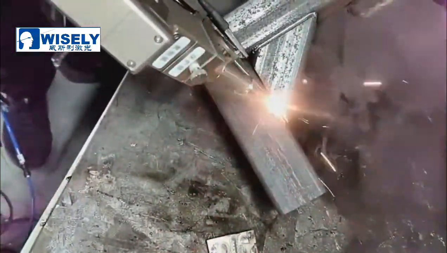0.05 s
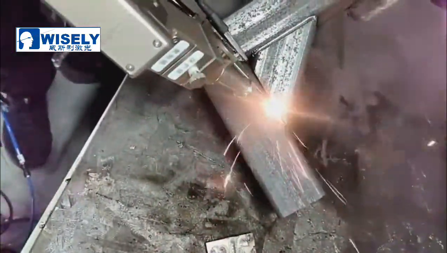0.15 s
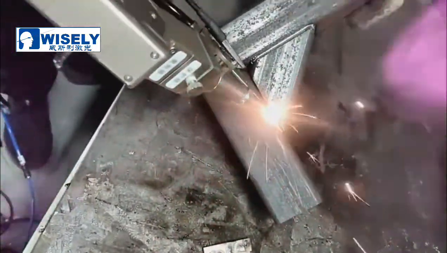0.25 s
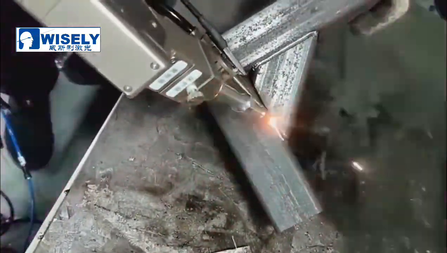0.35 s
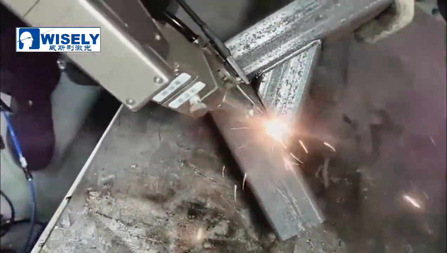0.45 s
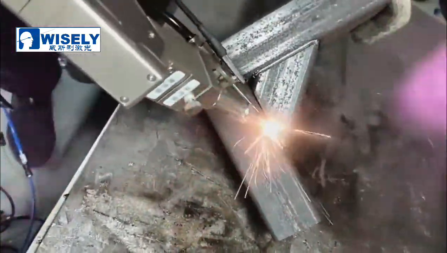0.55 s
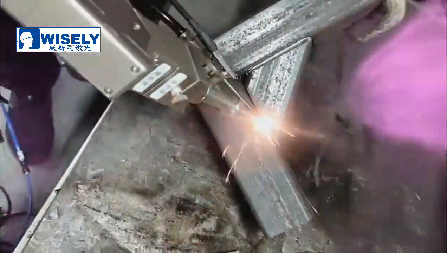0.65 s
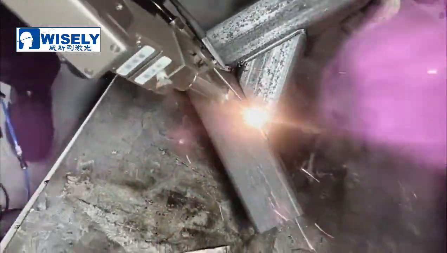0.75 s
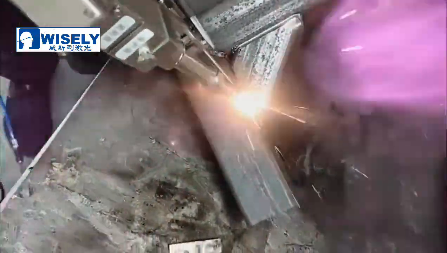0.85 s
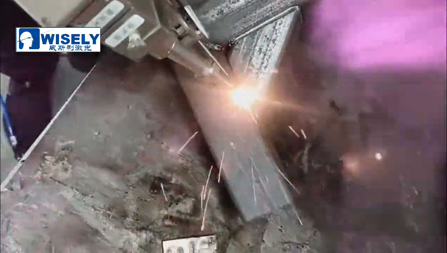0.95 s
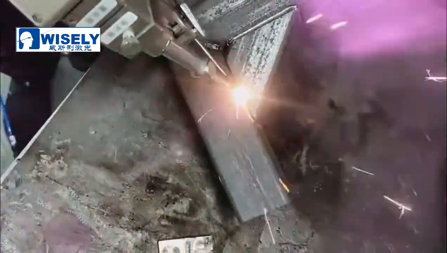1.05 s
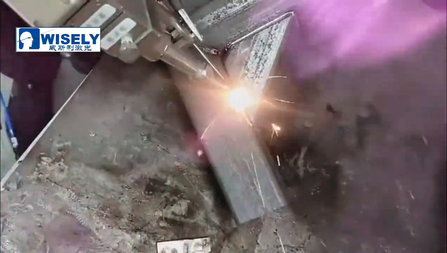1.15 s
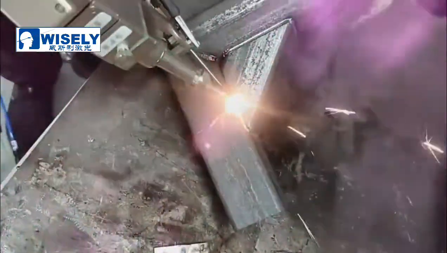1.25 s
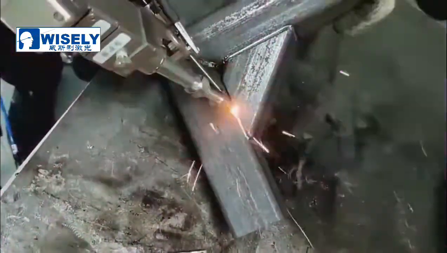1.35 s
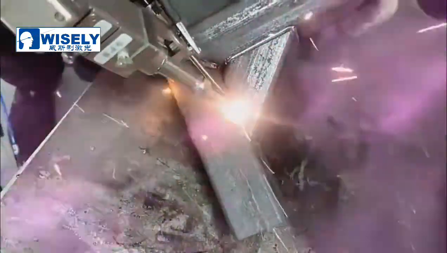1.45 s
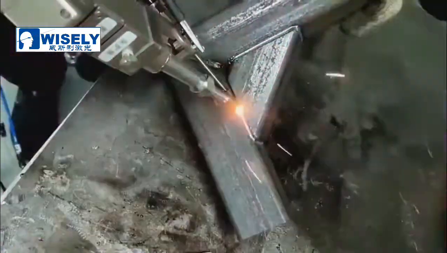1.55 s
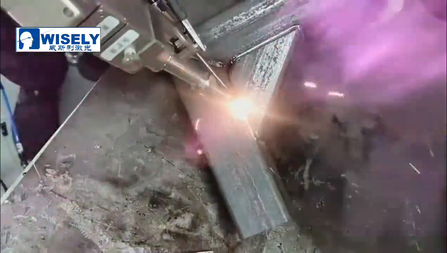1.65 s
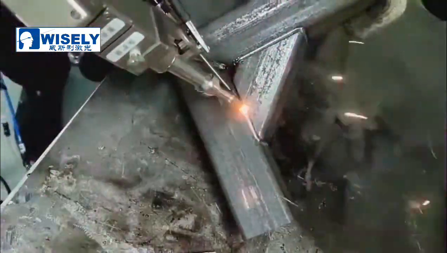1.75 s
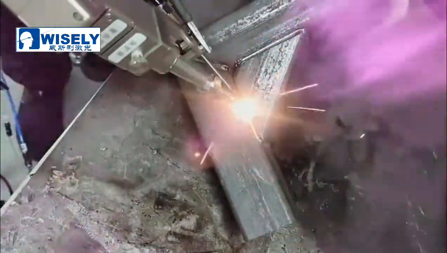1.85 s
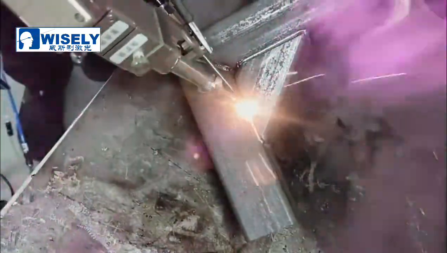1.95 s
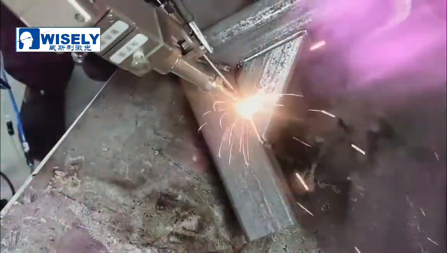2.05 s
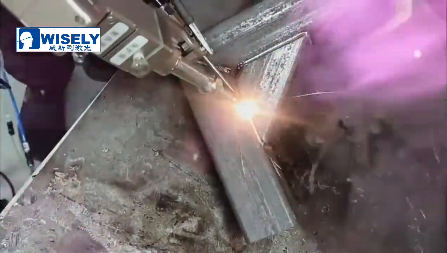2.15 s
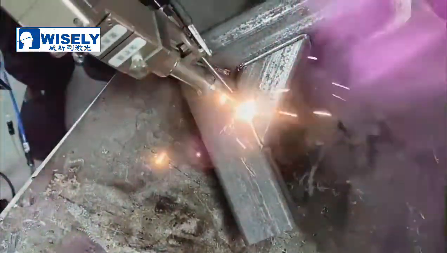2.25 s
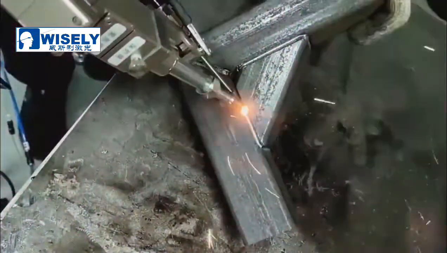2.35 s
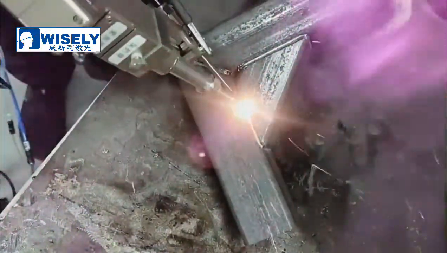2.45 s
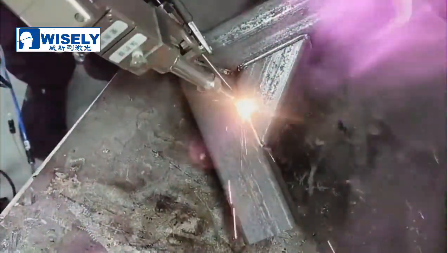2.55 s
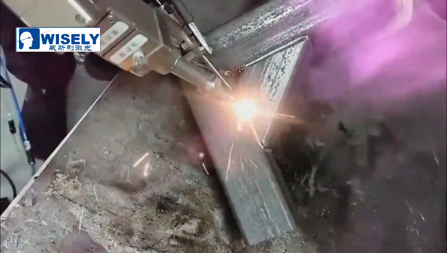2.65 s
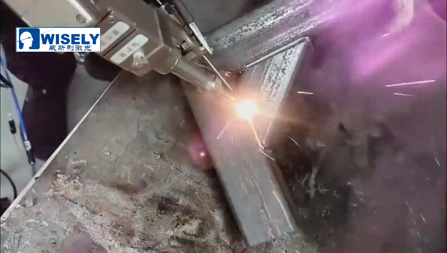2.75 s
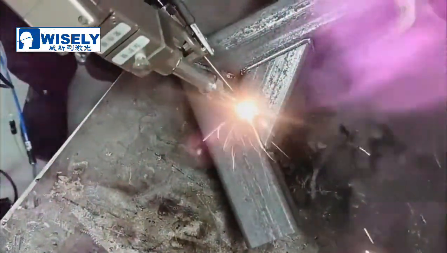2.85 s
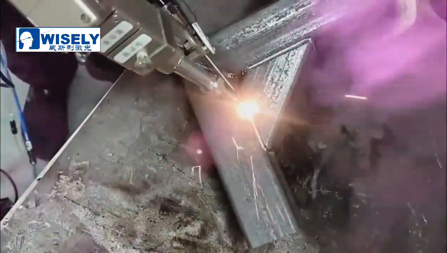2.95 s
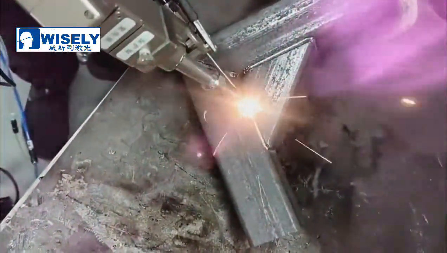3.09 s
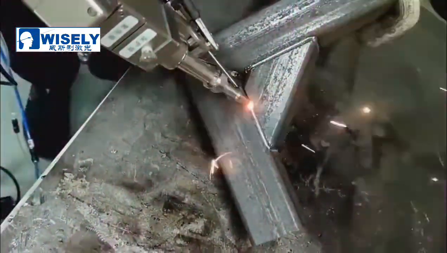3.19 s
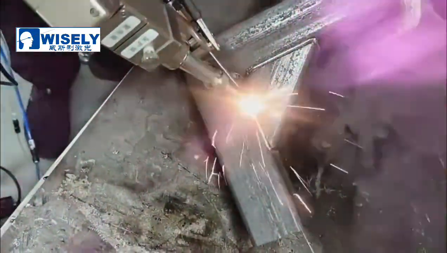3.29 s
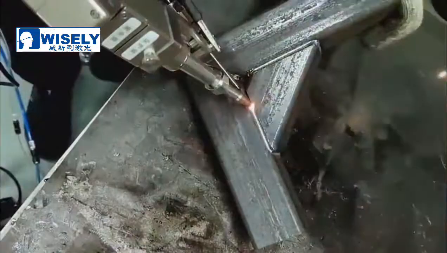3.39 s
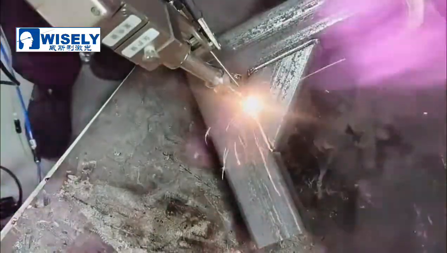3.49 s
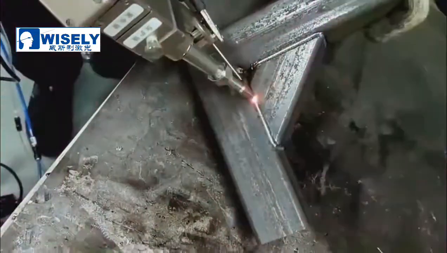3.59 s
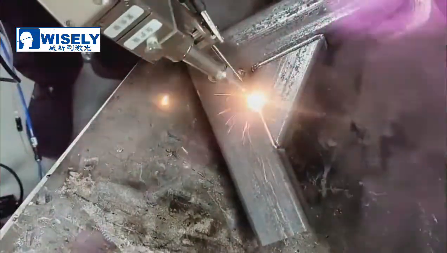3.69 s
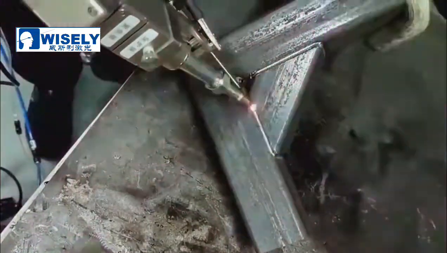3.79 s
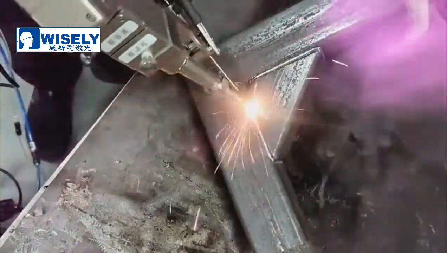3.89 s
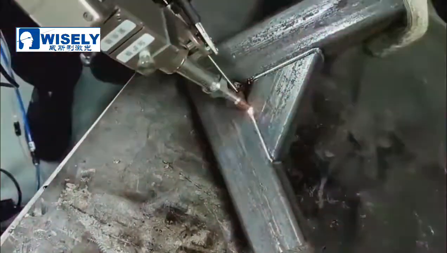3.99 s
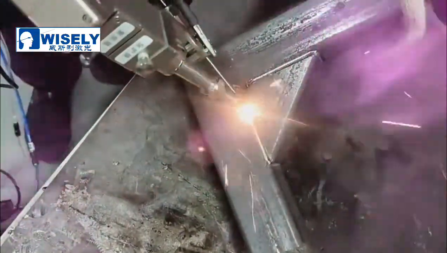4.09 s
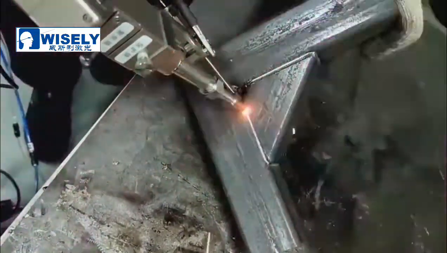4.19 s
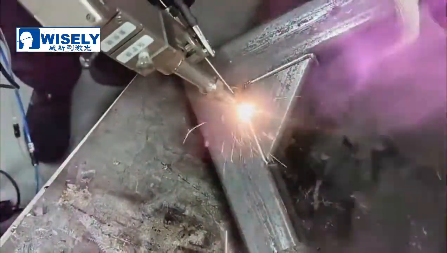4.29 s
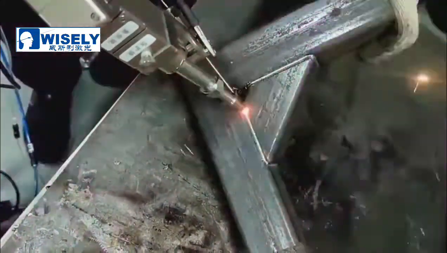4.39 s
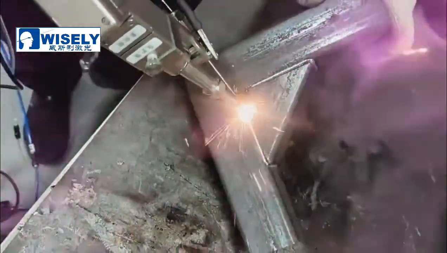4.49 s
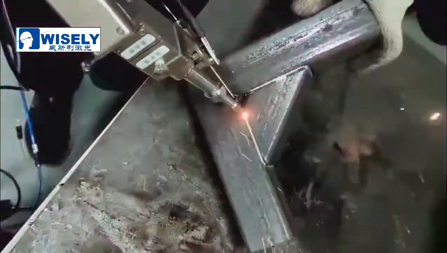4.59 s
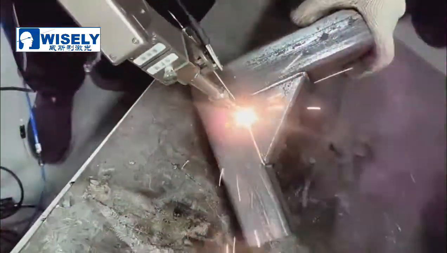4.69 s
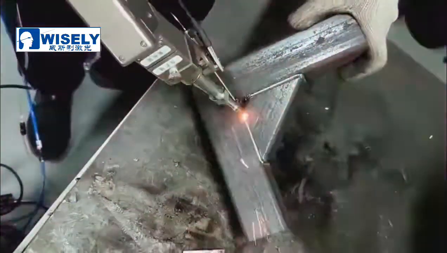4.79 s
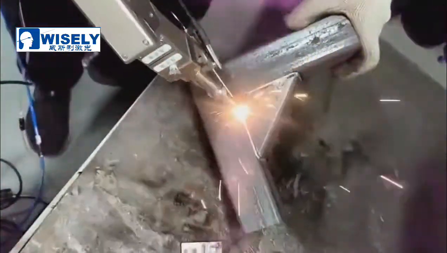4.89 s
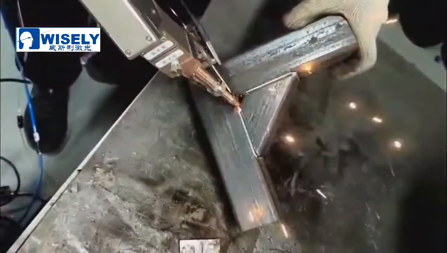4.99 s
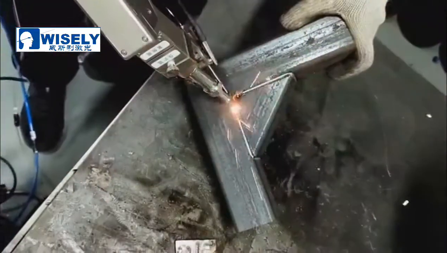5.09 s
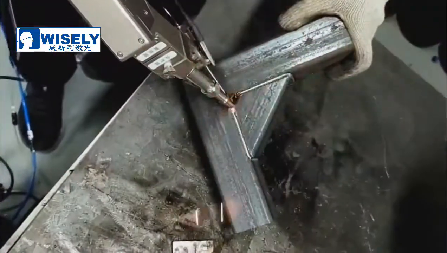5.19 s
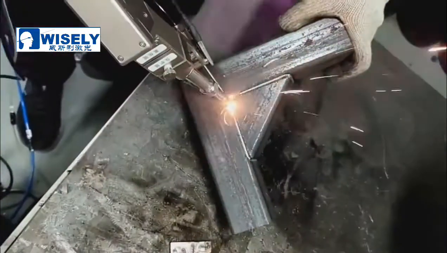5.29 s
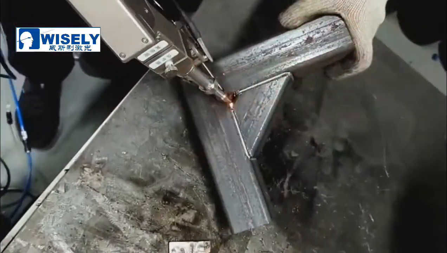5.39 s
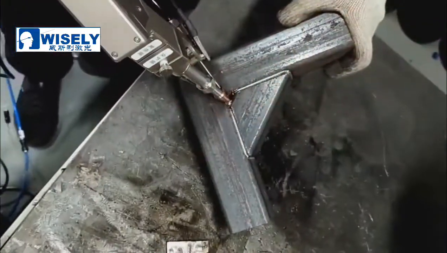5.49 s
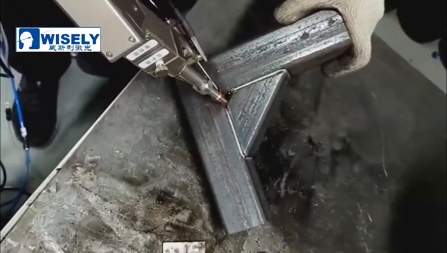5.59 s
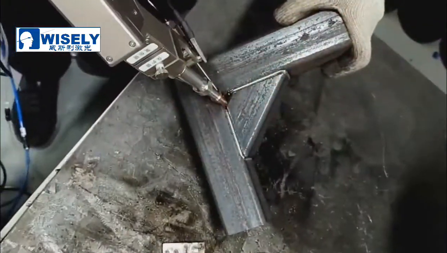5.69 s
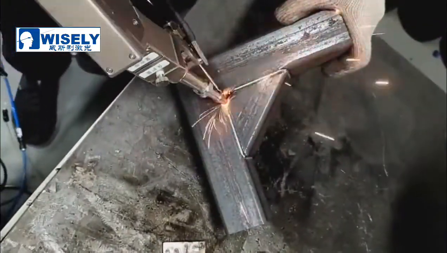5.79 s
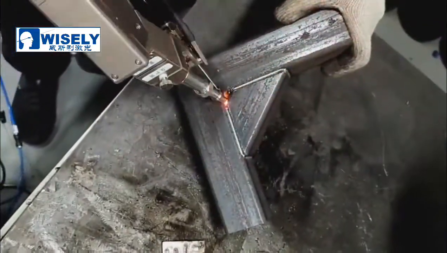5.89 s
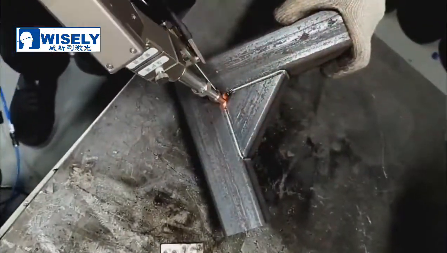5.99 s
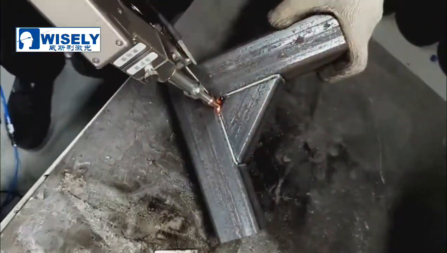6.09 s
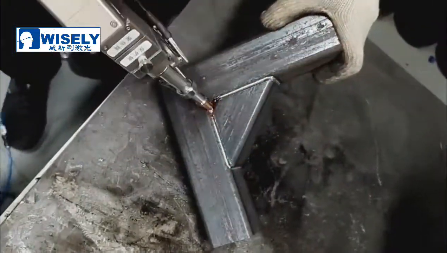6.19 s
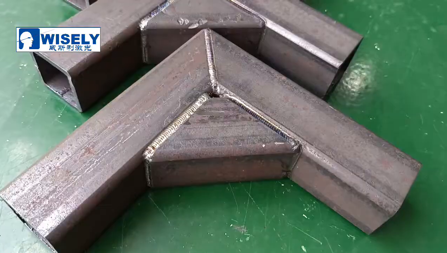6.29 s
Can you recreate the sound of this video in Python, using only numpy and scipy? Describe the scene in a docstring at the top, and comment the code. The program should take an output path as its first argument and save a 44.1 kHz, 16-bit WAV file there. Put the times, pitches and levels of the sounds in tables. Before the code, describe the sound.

Close, pulsing hiss and spatter of laser welding over low machine hum, ending with a motor swell, two tiny metal knocks and a sagging gas blow.

```python
"""Nozzle gas hisses over a droning fume fan and chiller; at once spatter pops and a laser welder starts firing.
Heard close at a workshop bench, on one microphone: five times a second the beam boils steel tube into
a hissing, crackling plume, made of noise and random bursts that ring in the gap between torch and tube.
Late on a motor swells and dies away, the welding stops and the gas shuts off to a faint bleed.
A puff and one last sagging blow of gas follow, and the nozzle knocks twice on the tube."""
import sys
import numpy as np
from scipy import signal
from scipy.fft import rfft, irfft
from scipy.io import wavfile
from scipy.ndimage import map_coordinates

SR = 44100
rng = np.random.default_rng(int(sys.argv[2]) if len(sys.argv) > 2 else 0)


def transcribe(signal):
    """Save signal, clipped to [-1, 1], as a 16-bit WAV file at the path in sys.argv[1]."""
    frames = np.atleast_2d(signal).T
    limited = np.clip(frames, -1, 1)
    pcm = np.round(limited * 32767).astype(np.int16)
    wavfile.write(sys.argv[1], SR, pcm)


N = 279594
TIME = np.arange(N) / SR
CUTOFF_HZ = 14050   # nothing is heard far above this


def from_db(db):
    """Decibels to amplitude gain."""
    return 10 ** (np.asarray(db) / 20)


def rms_one(x):
    """Scale to unit power."""
    return x / np.sqrt(np.mean(x ** 2) + 1e-20)


def in_time(rows):
    """Interpolate each column after the time column to a curve at every sample."""
    times, *columns = np.transpose(rows)
    return [np.interp(TIME, times, column) for column in columns]


def step(moment_s, swing_s):
    """A smooth tanh rise from 0 to 1, halfway up at the moment."""
    return (1 + np.tanh((TIME - moment_s) / swing_s)) / 2


def drift(rate_hz):
    """Random wander of spread about 1: noise through a double low-pass pole at this rate."""
    hop = 40   # computed on every 40th sample, then interpolated
    settling = 2000
    pole = np.exp(-2 * np.pi * rate_hz * hop / SR)
    noise = rng.standard_normal(N // hop + settling + 2)
    slow = signal.lfilter([1], [1, -2 * pole, pole * pole], noise)[settling:]
    return np.interp(np.arange(N) / hop, np.arange(len(slow)), rms_one(slow))


def response(spectrum, resonances=(), size=8192):
    """Minimum-phase impulse response of unit energy with this spectrum and these peaks or dips."""
    hz = np.maximum(np.arange(size // 2 + 1) * SR / size, 1)
    points = np.array(spectrum)
    level_db = np.interp(np.log(hz), np.log(points[:, 0]), points[:, 1])
    for centre_hz, width_hz, peak_db in resonances:
        level_db = level_db + peak_db * .5 ** ((2 * (hz - centre_hz) / width_hz) ** 2)
    level_db = level_db - np.clip((hz - CUTOFF_HZ) / 20, 0, 40)
    # folding the cepstrum onto positive times makes the response causal
    cepstrum = irfft(np.log(from_db(level_db)))
    cepstrum[1:size // 2] *= 2
    cepstrum[size // 2 + 1:] = 0
    impulse = irfft(np.exp(rfft(cepstrum)))
    return impulse / np.sqrt(np.sum(impulse ** 2))


def colour(x, spectrum, resonances=()):
    """Pass a sound through a spectrum and its resonances."""
    return signal.fftconvolve(x, response(spectrum, resonances))[:N]


def crackle(per_s, spread_db):
    """Tiny clicks at random moments, most small and a few large; rms 1."""
    size_db = spread_db * np.minimum(rng.exponential(1, N), 4)
    clicks = from_db(size_db) * rng.choice([-1, 1], N)
    return rms_one(clicks * (rng.random(N) < per_s / SR))


def bursts(rows, decay_s, crack_db):
    """Each row (time [s], level [dB]) is one sharp crack and a dying puff of noise."""
    out = np.zeros(N)
    age = TIME[:SR // 10]
    decay = np.exp(-age / decay_s)
    decay_rms = np.sqrt(np.mean(decay ** 2))
    puffs = rng.standard_normal((len(rows), len(age)))
    for (time_s, level_db), puff in zip(rows, puffs):
        shape = puff * decay
        shape[0] = from_db(crack_db)   # the crack is a single sample
        start = round(time_s * SR)
        out[start:start + len(age)] += from_db(level_db) * rms_one(shape) * decay_rms
    return out


def moving_band(x, centre_hz, width_hz, order=256):
    """A resonance of gain 1 whose centre follows a curve, updated every `order` samples."""
    out, state = np.zeros(N), np.zeros(2)
    radius = np.exp(-np.pi * width_hz / SR)
    zeros = np.array([1, 0, -1]) * (1 - radius * radius) / 2
    for i in range(0, N, order):
        poles = [1, -2 * radius * np.cos(2 * np.pi * centre_hz[i] / SR), radius * radius]
        out[i:i + order], state = signal.lfilter(zeros, poles, x[i:i + order], zi=state)
    return out


def tone(hz, waver_hz):
    """A machine tone that wavers in pitch and strength; rms 1."""
    phase = 2 * np.pi * np.cumsum(hz + waver_hz * drift(8.22)) / SR
    return rms_one(np.sin(phase) * from_db(1.6 * drift(3.9)))


VALVE_S = 0.013   # swing of the gas valve
BLEED_DB, BLEED_FALL_DB_PER_S = -20, 35   # relative to full flow


def flow_until(off_s):
    """Full gas flow until the valve shuts, then the hose bleeds a faint, dying hiss."""
    shut = step(off_s, VALVE_S)
    bleed_db = BLEED_DB - BLEED_FALL_DB_PER_S * np.maximum(TIME - off_s, 0)
    return 1 - shut + shut * from_db(bleed_db)


# spectrum of the gas from the nozzle: (frequency [Hz], relative level per Hz [dB])
GAS_SPECTRUM = [(600, -21.5), (1500, -18), (2100, -5.5), (3200, -4), (4100, 2), (5200, 0), (6400, -1.5),
                (7300, -2), (8100, -14), (9000, -22), (11500, -26), (12900, -12), (14000, -11)]
# resonances of the gas jet in the joint: (centre [Hz], width [Hz], peak [dB])
JET_RESONANCES = [(2370, 165, -11), (2620, 200, -3.5), (3420, 200, 1), (4110, 210, 5.5), (5040, 270, -1.5),
                  (5700, 410, 4), (6400, 450, 5), (7270, 350, -12), (8020, 440, 9)]
GAS_DB, GAS_OFF_S = -41.5, 5.437   # level at the nozzle, before the gap colours it


def shielding_gas(flutter_db):
    """Turbulent gas streams from the nozzle, fluttering, during and between the shots."""
    flow = flow_until(GAS_OFF_S) * from_db(GAS_DB + flutter_db * drift(110))
    return colour(rng.standard_normal(N) * flow, GAS_SPECTRUM, JET_RESONANCES)


# level of the low rumble: (time [s], level [dB])
RUMBLE_LEVEL_CURVE = [(0, -44.3), (2.9, -43.5), (3.05, -42.5), (3.84, -40), (3.9, -53), (4.1, -40.5),
                      (4.45, -44), (5.28, -39), (5.55, -42.5), (6.25, -45.5)]
# spectrum of the low rumble: (frequency [Hz], relative level per Hz [dB])
RUMBLE_SPECTRUM = [(22, -31), (48, -27.5), (68, -6), (88, -1), (105, -1.5), (125, -1.5), (150, -7.5),
                   (185, -5.5), (240, -13), (320, -20), (600, -59.5)]
# spectrum of rushing air, for the fan and the motor: (frequency [Hz], relative level per Hz [dB])
AIR_SPECTRUM = [(150, -7.5), (300, 0), (420, 1), (520, -2.5), (680, 0), (900, -5.5), (1400, -12.5),
                (2500, -15.5), (3500, -22), (5600, -22), (8000, -32.5), (14000, -48.5)]
# chiller tones: (frequency [Hz], rms level [dB])
HUM_TONES = [(127, -50), (478, -67.5), (653, -62)]


def machines(buffet_db):
    """Behind the bench: the fume fan is lumpy rumble and steady rush of noise, the chiller wavering tones."""
    rumble_db, = in_time(RUMBLE_LEVEL_CURVE)
    lumps = from_db(rumble_db + buffet_db * drift(30))
    rumble = lumps * colour(rng.standard_normal(N), RUMBLE_SPECTRUM)
    rush = from_db(-51.5) * colour(rng.standard_normal(N), AIR_SPECTRUM)
    hum = sum(from_db(level_db) * tone(hz, waver_hz=3.08) for hz, level_db in HUM_TONES)
    return rumble + rush + hum


# spatter bursting from the melt: (time [s], relative level [dB])
SPATTER_POPS = [(0.0379, -16.5), (0.2382, -19), (0.4441, -24), (0.6432, -26), (1.0746, -18), (1.4395, -21),
                (1.4661, -19.5), (1.5564, -19), (1.759, -17), (1.7755, -19), (2.2427, -16.5),
                (2.464, -18.5), (2.8443, -27), (3.4462, -18.5), (3.8685, -24), (4.2719, -16.5),
                (4.4411, -17.5), (4.475, -22), (4.6393, -26), (4.6752, -20.5)]
# spectrum of a pop: (frequency [Hz], relative level per Hz [dB])
POP_SPECTRUM = [(300, -0.5), (1400, -14), (3000, -5.5), (4300, 3.5), (8000, -3.5), (14000, -5)]
# resonances and dips of the gap between nozzle and joint, which also colour the plume:
# (centre [Hz], width [Hz], peak [dB])
GAP_RESONANCES = [(1830, 48, 7), (2160, 110, 6), (2390, 200, -3), (2630, 300, -1.5), (4070, 250, 4),
                  (4630, 270, 5), (4990, 110, 2), (7180, 300, -3.5), (7770, 760, 4), (9580, 350, -7.5),
                  (10140, 330, 2.5), (11840, 450, -3), (12350, 370, 4), (13300, 320, -0.5),
                  (13600, 400, 2.5)]


def spatter(trim_db):
    """Drops burst from the melt: each is a crack and a very short puff, ringing in the gap."""
    pops = bursts(SPATTER_POPS, decay_s=.0018, crack_db=13)
    return from_db(trim_db) * colour(pops, POP_SPECTRUM, GAP_RESONANCES)


# the laser fires on a clock until the trigger is let go
SHOTS_PER_S, FIRST_SHOT_S, TRIGGER_OFF_S = 5, .041, 5.314
SHOT_S, SHOT_RISE_S, SHOT_FALL_S = 0.15, 0.014, 0.0085   # length, and swings of rise and fall


def beam_power(spread_db):
    """On each clock tick a shot of slightly random strength swells as the steel boils, then ramps down."""
    starts = np.arange(FIRST_SHOT_S, TRIGGER_OFF_S, 1 / SHOTS_PER_S)
    strengths_db = spread_db * rng.standard_normal(len(starts))
    power = np.zeros(N)
    for on, strength_db in zip(starts, strengths_db):
        off = min(on + SHOT_S, TRIGGER_OFF_S)   # letting go cuts the last shot short
        power += from_db(strength_db) * step(on, SHOT_RISE_S) * (1 - step(off, SHOT_FALL_S))
    return power


# strength of the plume, weaker as the torch reaches the corner: (time [s], relative level [dB])
PLUME_LEVEL_CURVE = [(0, -33), (3.5, -32), (4.45, -34), (5.1, -36.5), (5.3, -36)]
# spectrum of the plume: (frequency [Hz], relative level per Hz [dB])
PLUME_SPECTRUM = [(500, -26.5), (1500, -22.5), (2100, -12.5), (3200, -4.5), (4000, -1), (5500, -2.5),
                  (7000, -3), (8500, -3), (11000, -1), (12500, 1), (14000, 1.5)]


def plume(power, trim_db, crackle_db, flutter_db, surge_db, simmer_db):
    """Metal vapour jets from the melt, fluttering and crackling; the hot pool simmers on after each shot."""
    boil = rms_one(rng.standard_normal(N) + from_db(crackle_db) * crackle(per_s=5000, spread_db=3))
    unrest = from_db(flutter_db * drift(160) + surge_db * drift(9.8))
    cooling = np.exp(-1 / (.04 * SR))   # the pool cools with a 40 ms time constant
    simmer = from_db(simmer_db) * signal.lfilter([1 - cooling], [1, -cooling], power)
    vapour = boil * unrest * np.maximum(power, simmer)
    strength_db, = in_time(PLUME_LEVEL_CURVE)
    return from_db(trim_db + strength_db) * colour(vapour, PLUME_SPECTRUM, GAP_RESONANCES)


def restless(x, count=5):
    """The melt changes shape, so broad bands of its hiss swell and sink on their own."""
    for hz in np.geomspace(4300, 12800, count):
        swell = from_db(1.5 * drift(4)) - 1
        x = x + swell * signal.lfilter(*signal.iirpeak(hz, 6, fs=SR), x)
    return x


# two weakened bands and the ring of the gap, as the hand moves:
# (time [s], first weak band [Hz], second weak band [Hz], ring [Hz], ring gain [factor])
HAND_POSE = [(0, 2680, 3170, 3030, .8), (.3, 2640, 3170, 3110, 2.2), (.8, 2690, 3320, 3100, 2.4),
             (1.2, 3100, 3180, 2780, .3), (4.3, 3060, 3310, 2740, .3), (4.55, 3430, 3640, 2680, .7),
             (4.9, 3280, 3550, 2730, 1.8), (5.4, 3280, 3540, 2830, 3.3)]


def gap_ring(x, weak_width_hz, ring_width_hz, count=2):
    """Sound bouncing between torch and tube builds up in one band; two narrow bands are weakened and wander."""
    first_hz, second_hz, ring_hz, ring_gain = in_time(HAND_POSE)
    x = x + ring_gain * moving_band(x, ring_hz, ring_width_hz)
    tremor = drift(4.6)   # shared by both bands
    for weak_hz in (first_hz, second_hz):
        wander_hz = 45 * tremor + 50 * drift(8)
        for repeat in range(count):
            x = x - moving_band(x, weak_hz + wander_hz, weak_width_hz)
    return x


def torch_shadow(x):
    """Turning into the corner, the torch hides the weld and shades its treble."""
    dull = signal.lfilter(*signal.butter(1, 7500, fs=SR), x)
    treble = x - dull
    return dull + treble * from_db(-8.5 * step(5.32, swing_s=0.37))


def weld():
    """Plume, spatter and gas, mixed with the gap's ring."""
    power = beam_power(spread_db=.5)
    pops = spatter(trim_db=-3.9)
    vapour = plume(power, trim_db=2.0, crackle_db=-3, flutter_db=1.51, surge_db=0.75, simmer_db=-14.5)
    gas = shielding_gas(flutter_db=2.5)
    share = np.minimum(2 * power, 1)   # share of the gas that is filtered with the plume
    filtered = gap_ring(restless(vapour) + pops + share * gas, weak_width_hz=332, ring_width_hz=140)
    return torch_shadow(filtered + (1 - share) * gas)


MOTOR_PEAK_S, MOTOR_RISE_DB_PER_S, MOTOR_FALL_DB_PER_S = 5.27, 15.5, 41
WHINE_HZ, WHINE_DB, MOTOR_AIR_DB = 693, -53.5, -48   # levels at the peak


def motor():
    """A motor's whine and rush of air swell slowly together and die faster."""
    age = TIME - MOTOR_PEAK_S
    effort = from_db(np.minimum(MOTOR_RISE_DB_PER_S * age, -MOTOR_FALL_DB_PER_S * age))
    air = from_db(MOTOR_AIR_DB) * colour(rng.standard_normal(N), AIR_SPECTRUM)
    whine = from_db(WHINE_DB) * tone(WHINE_HZ, waver_hz=5.98)
    return effort * (air + whine)


BLOW_ON_S, BLOW_OFF_S, BLOW_DB, BLOW_SAG_DB_PER_S = 5.682, 6.072, -30.5, 26
# spectrum of the valve's puff: (frequency [Hz], relative level per Hz [dB])
PUFF_SPECTRUM = [(50, -24), (150, -3), (330, 4), (600, -12.5), (1500, -31), (5000, -52)]


def valve_puff():
    """A low, dying puff of noise as the valve opens, just before the last blow."""
    lead_s, level_db = .013, -38
    return colour(bursts([(BLOW_ON_S - lead_s, level_db)], decay_s=.04, crack_db=0), PUFF_SPECTRUM)


# sizzle relative to the rush: faint, and stronger while the jet meets the edge of the tube
SIZZLE_DB, EDGE_DB, EDGE_ON_S, EDGE_OFF_S, EDGE_SWING_S = -17, -3.5, 5.76, 5.92, .012
# spectrum of gas rushing into the corner: (frequency [Hz], relative level per Hz [dB])
RUSH_SPECTRUM = [(150, -11), (300, -5), (800, -9), (1400, -13), (1900, -8), (2350, 0), (2800, 4.5),
                 (3550, -6), (4500, 1.5), (5500, 0.5), (6400, 2), (7150, -5), (8800, -28), (14000, -30)]
# spectrum of gas sizzling on the edge: (frequency [Hz], relative level per Hz [dB])
SIZZLE_SPECTRUM = [(5000, -16), (7100, -12), (7750, 3.5), (8800, -11), (10400, -3), (11200, -4),
                   (11900, -5), (12700, 2), (14000, 1.5)]


def last_blow(flutter_db):
    """Gas rushes into the corner of the joint, sagging as its pressure drops, and sizzles on the edge."""
    sag_db = BLOW_SAG_DB_PER_S * np.maximum(TIME - BLOW_ON_S, 0)
    flow = step(BLOW_ON_S, VALVE_S) * flow_until(BLOW_OFF_S) * from_db(BLOW_DB - sag_db)
    on_edge = step(EDGE_ON_S, EDGE_SWING_S) * (1 - step(EDGE_OFF_S, EDGE_SWING_S))
    sizzling = from_db(SIZZLE_DB) + from_db(EDGE_DB) * on_edge
    rush = colour(rng.standard_normal(N) * flow, RUSH_SPECTRUM, JET_RESONANCES)
    sizzle = colour(crackle(per_s=10000, spread_db=1.0) * flow * sizzling, SIZZLE_SPECTRUM)
    return (rush + sizzle) * from_db(flutter_db * drift(90))


# the nozzle knocks on the tube: (time [s], relative level [dB])
NOZZLE_KNOCKS = [(5.687, -18.5), (5.7577, -21.5)]
# spectrum of a knock: (frequency [Hz], relative level per Hz [dB])
KNOCK_SPECTRUM = [(200, 6), (1200, -14), (3000, 3), (6000, 2), (9000, -21), (14000, -8)]


def nozzle_knocks():
    """Metal touches metal: each knock is a crack and a very short burst of noise."""
    return colour(bursts(NOZZLE_KNOCKS, decay_s=0.0015, crack_db=2), KNOCK_SPECTRUM)


def bench_echoes(x, echo_db, sway_s, count=6):
    """Short echoes off bench and torch; their paths sway with the hand and ripple the hiss."""
    out = x
    for lag_s in np.geomspace(.0011, .0075, count):
        late_s = TIME - lag_s - sway_s * drift(0.54)
        out = out + from_db(echo_db) * map_coordinates(x, [late_s * SR], order=3)
    return out / np.sqrt(1 + count * from_db(echo_db) ** 2)


def workshop(x, t60_s):
    """The diffuse tail of the room: decaying noise that starts 8 ms after the sound."""
    age = TIME[:SR // 2]
    tail = rng.standard_normal(len(age)) * from_db(-60 * age / t60_s) * (age > .008)
    return signal.fftconvolve(x, tail / np.sqrt(np.sum(tail ** 2)))[:N]


def scene():
    """Torch sounds with bench echoes and room, machines behind: one close microphone, same on both channels."""
    at_torch = weld() + valve_puff() + last_blow(flutter_db=1.25) + nozzle_knocks()
    torch = bench_echoes(at_torch, echo_db=-17.5, sway_s=.00003)
    room = from_db(-29.0) * workshop(torch, t60_s=.3)
    mono = torch + room + machines(buffet_db=1.9) + motor()
    return np.array([mono, mono])


# the sound fades at the end: (time [s], level [dB])
END_FADE = [(6.262, -2.5), (6.275, -42)]


def record(dry):
    """Fade the sound out at the end and cut its top steeply."""
    fade_db, = in_time(END_FADE)
    low_pass = signal.ellip(10, .2, 70, CUTOFF_HZ, fs=SR, output="sos")
    return signal.sosfilt(low_pass, dry * from_db(fade_db))


dry = scene()
out = record(dry)
transcribe(out)
```